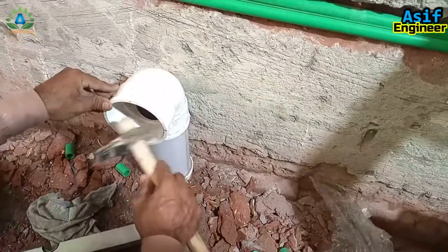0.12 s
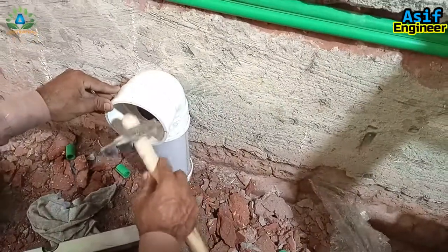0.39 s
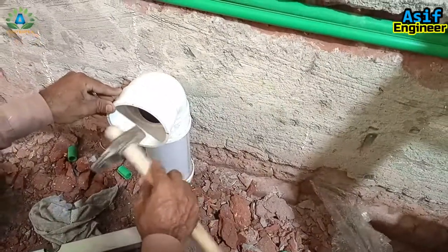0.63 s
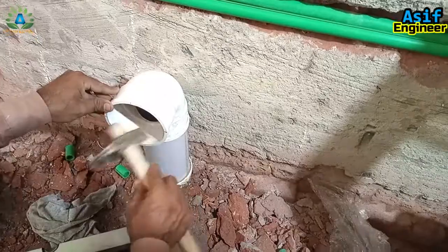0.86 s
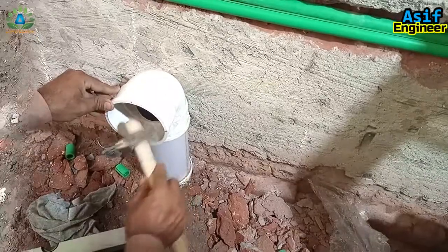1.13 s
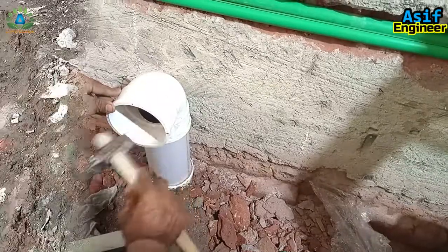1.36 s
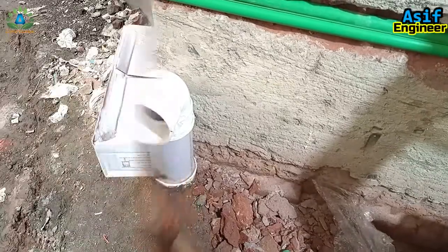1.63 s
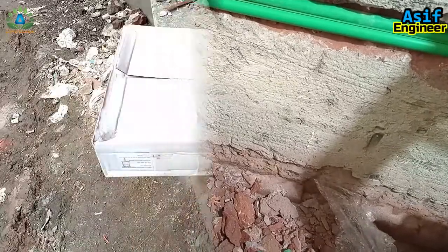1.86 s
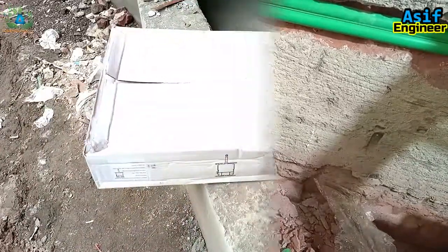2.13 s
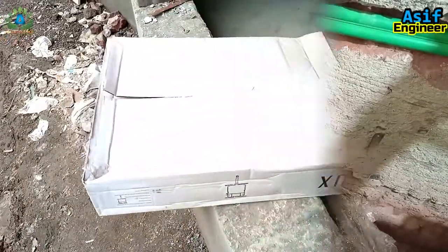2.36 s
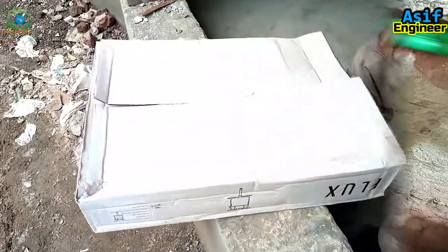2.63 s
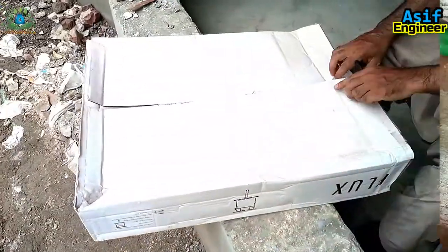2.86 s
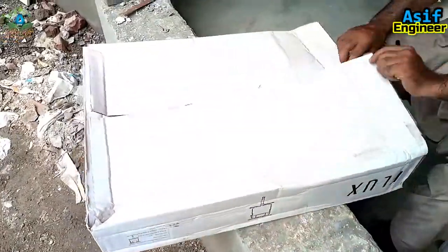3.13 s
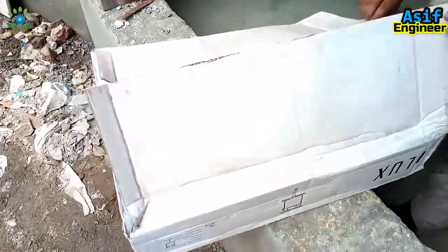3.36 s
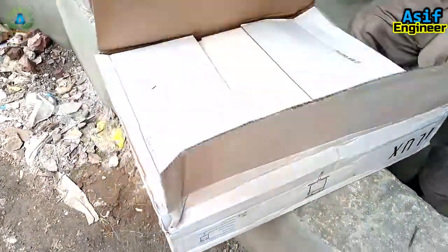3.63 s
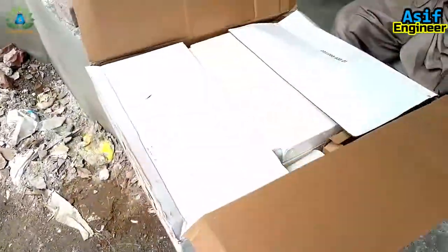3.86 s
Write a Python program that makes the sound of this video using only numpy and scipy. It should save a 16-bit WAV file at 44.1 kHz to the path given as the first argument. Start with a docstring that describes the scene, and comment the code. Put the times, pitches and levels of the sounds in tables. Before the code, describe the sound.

Hammer taps ring on a hollow plastic pipe, then a steady site roar with cardboard rustling.

```python
"""First a windy stereo moment: coloured hiss, short low sine thumps, faint ringing, a dull knock and a
steel clink made of narrow noise bands. At 0.44 s it cuts to mono: low hum sines over quiet hiss, while
a hammer taps a plastic pipe in a bare masonry space (noise cracks, ringing sines, echoes, a noisy tail).
This cross-fades into the louder roar of the site: noise, booming bands and a surging low sine.
There a cardboard box is knocked and rustles, as bursts of band noise."""
import sys
import numpy as np
from scipy import signal
from scipy.fft import rfft, irfft
from scipy.io import wavfile
from scipy.ndimage import uniform_filter1d

SR = 44100
rng = np.random.default_rng(int(sys.argv[2]) if len(sys.argv) > 2 else 0)


def field_ratio(decibels):
    """Amplitude ratio for a level in dB (20 dB per decade); scalars and array-likes work."""
    return 10 ** (np.asarray(decibels, dtype=float) / 20)


def materialize(psi):
    """Save the field psi as 16-bit PCM at rate SR to the path in sys.argv[1].

    A 1-D psi becomes a single channel; in a 2-D psi each row is a channel.
    """
    bounded = np.clip(np.atleast_2d(psi).T, -1, 1)
    quanta = np.round(bounded * 32767).astype(np.int16)
    wavfile.write(sys.argv[1], SR, quanta)


N = 176400
t = np.arange(N) / SR
CUT_S = .444  # the stereo moment is silent from here


def curve(points, hz):
    """Read a value off (Hz, value) points joined on a log-frequency axis."""
    p = np.array(points, float)
    return np.interp(np.log(hz + 1), np.log(p[:, 0]), p[:, 1])


def set_rms(x, db):
    """Scale a sound to an rms level in dB."""
    return x * field_ratio(db) / np.sqrt(np.mean(x ** 2))


def band(x, hz, width):
    """Keep the band of this width around hz, with a Butterworth filter."""
    edges = np.clip([hz - width / 2, hz + width / 2], 10, .49 * SR)
    return signal.sosfilt(signal.butter(2, edges, "band", fs=SR, output="sos"), x)


def walk(rate):
    """Slow random wander of spread 1: random steps, rate per second, smoothed into slopes."""
    step_samples = int(SR / rate)
    steps = np.repeat(rng.standard_normal(int(N / 400)), step_samples)[:N]
    wander = uniform_filter1d(steps, step_samples)
    return wander / np.std(wander)


def hiss(points, flicker_db, rate, t60=None, size=N):
    """Coloured noise in half-octave slices; each flickers, or dies away at its own rate."""
    hold_s = 0.028  # full level this long before dying away
    hz = np.fft.rfftfreq(size, 1 / SR)
    # The last two points are left out: the colour stays level above the one before them.
    spectrum = rfft(rng.standard_normal(size)) * field_ratio(curve(points[:-2], hz))
    out = 0
    for octave in np.arange(4, 15, .5):
        # Triangular slices that overlap, centred on 2 ** octave Hz
        share = np.clip(1 - 2 * abs(np.log2(hz + 1) - octave), 0, 1)
        part = irfft(spectrum * share, size)
        if t60 is None:
            out = out + part * field_ratio(flicker_db * walk(rate))
        else:
            dying_s = np.maximum(t[:size] - hold_s, 0)
            out = out + part * field_ratio(-60 * dying_s / curve(t60, 2 ** octave))
    return out


def ring(modes, size, rough_db, rate):
    """Decaying sines, one per way the object vibrates; each swells and dips by chance."""
    u = t[:size]
    out = np.zeros(size)
    for k, (hz, db, t60) in enumerate(modes):
        sign = (-1) ** k if hz > 300 else 1  # every other higher sine is flipped
        envelope = field_ratio(db - 60 * u / t60 + rough_db * walk(rate)[:size])
        out = out + sign * envelope * np.sin(2 * np.pi * hz * u)
    return out


def add(out, x, at):
    """Mix x into out from time at."""
    i = int(at * SR)
    out[..., i:i + x.shape[-1]] += x[..., :N - i]


def puff(at, db, hz, width, rise, t60):
    """Band noise that rises and dies; db is its rms before that shaping."""
    u = np.maximum(t - at, 0)
    noise = set_rms(band(rng.standard_normal(N), hz, width), db)
    return noise * (1 - np.exp(-u / rise)) * field_ratio(-60 * u / t60)


def colour(x, points):
    """Filter a sound by (Hz, dB) points."""
    return irfft(rfft(x) * field_ratio(curve(points, np.fft.rfftfreq(N, 1 / SR))), N)


def wind():
    """Wind as flickering hiss, with separate noise for the middle and the side of the stereo image."""
    # Colour of the wind. Each row: frequency in Hz, relative level per Hz in dB.
    wind_colour = [(12, -40), (20, 3), (162, -5), (229, -5), (366, -6), (456, -12.5), (766, -16.5),
                   (2150, -23), (2380, -25), (6520, -32.5), (7200, -38.5), (9360, -59.5), (15800, -120)]
    # Recording filter: steep drop near 8 kHz, faint treble above. Each row: frequency in Hz, gain in dB.
    recording_filter = [(6600, 0), (7500, -6), (7850, -45), (8600, -45), (8850, -14), (11800, -13),
                        (12300, -20), (15400, -24), (15800, -80)]
    mid = colour(set_rms(hiss(wind_colour, 1.2, 25), -46.5), recording_filter)
    side = colour(set_rms(hiss(wind_colour, 1.2, 25), -52.5), recording_filter)
    return mid, side


def thumps():
    """Gusts thump the ports: short low sines under a bell-shaped swell, higher at the side."""
    # Thumps. Each row: time of the peak in seconds, mid peak in dB, mid pitch in Hz,
    # length in seconds, side level relative to mid in dB.
    thump_rows = [(.002, -20.5, 100, 0.0095, -9), (0.017, -30.5, 139, 0.036, -11),
                  (0.049, -34.5, 105, .035, -9), (0.145, -35.5, 99.7, 0.025, -13),
                  (0.169, -20, 90.7, 0.0067, -6), (0.186, -20.5, 150, 0.017, -10),
                  (.182, -26, 300, 0.006, -3), (0.201, -30.5, 89.7, 0.033, -10),
                  (0.288, -44.5, 302.5, 0.016, -5), (0.335, -48, 324.5, 0.056, -6),
                  (0.394, -31, 85.8, 0.025, -15)]
    mid, side = np.zeros(N), np.zeros(N)
    for at, db, hz, length, side_db in thump_rows:
        shape = field_ratio(db) * np.exp(-(2 * (t - at) / length) ** 2)
        phase = rng.random(2)
        mid = mid + shape * np.sin(2 * np.pi * (hz * t + phase[0]))
        side = side + shape * field_ratio(side_db) * np.sin(2 * np.pi * (1.4 * hz * t + phase[1]))
    return mid, side


def whine():
    """Faint far ringing: three narrow noise bands dying by 50 dB a second."""
    out = np.zeros(N)
    for hz, db in [(2300, -64), (4300, -66), (11700, -88)]:
        out = out + set_rms(band(rng.standard_normal(N), hz, 120), db)
    return out * field_ratio(-50 * t)


def knock():
    """A dull knock: one quick burst of noise around 760 Hz."""
    return puff(at=.024, db=-41, hz=760, width=640, rise=0.001, t60=0.25)


def clink():
    """A steel tool clinks: narrow noise bands ring at its modes, then drop to a tenth."""
    start_s, stop_s, level_db = .301, .378, -45.5
    # Steel modes. Each row: frequency in Hz, relative level in dB, time to fall 60 dB in seconds.
    steel = [(850, -5.5, 0.63), (1205, -4.5, 0.38), (1296, -1.5, 0.74), (1664, -5, 0.27), (2184, -9.5, 1),
             (4685, -1.5, 0.13), (6240, -17, 0.2), (6500, -14, .1), (9300, -26, 0.16), (9870, -20, .18),
             (11320, -18, 0.12), (13770, -35.5, .4), (14600, -46, 0.415)]
    out = np.zeros(N)
    for hz, db, t60 in steel:
        out = out + puff(start_s, level_db + db, hz, 94 + 0.014 * hz, 0.0012, t60)
    return out * np.clip((stop_s - t) / .01, .1, 1)


def windy_shot():
    """Left and right are mid plus and minus side, so wind and thumps differ between them."""
    wind_mid, wind_side = wind()
    thump_mid, thump_side = thumps()
    ringing = whine() + clink()
    mid = wind_mid + thump_mid + knock() + ringing
    side = wind_side + thump_side + ringing * field_ratio(-2.5)
    return np.array([mid + side, mid - side]) * np.clip((CUT_S - t) / 0.0059, 0, 1)


def yard():
    """Quiet flickering hiss with low hum sines whose pitch drifts a little."""
    # Colour of the hiss. Each row: frequency in Hz, relative level per Hz in dB.
    yard_colour = [(25, -35), (60, -10), (100, -8.5), (150, -10), (250, -12), (500, -16), (900, -17.5),
                   (2000, -16.5), (4000, -21.5), (7200, -28), (9000, -28), (16000, -28)]
    # Hum sines. Each row: frequency in Hz, rms level before wavering in dB, waver of level in dB.
    hum_rows = [(118, -63.5, 6), (278.6, -78.5, 0)]
    hum = np.zeros(N)
    for hz, db, waver_db in hum_rows:
        peak = np.sqrt(2) * field_ratio(db + waver_db * walk(12))
        hum = hum + peak * np.sin(2 * np.pi * (hz * t + 0.041 * walk(1.7)))
    return set_rms(hiss(yard_colour, 0.33, 8.9), -58) + hum


def hammer():
    """Each tap: a crack, the ringing pipe wall and air column, echoes and a noisy tail from the walls."""
    # Taps. Each row: start in seconds, overall level in dB, then gains in dB for treble, bass, pipe ring.
    taps = [(0.441, -28, -8.5, 3, 1), (0.796, -21, 2, -2.5, -1), (1.173, -18.5, 3.5, -3.5, -1),
            (1.571, -19.5, 2.5, -4.5, -2.5)]
    # Pipe wall modes. Each row: frequency in Hz, relative level in dB, time to fall 60 dB in seconds.
    pipe = [(461, -5, .4), (590, -14, .4), (732, -8, .45), (786, -8, .5), (824, -8, .35), (930, -9, .2),
            (990, -3, .16), (1210, -11, .25), (1300, -1, .22), (1378, -6, .2), (1880, -6, .13),
            (2035, -10, .3), (2215, -8, .4), (2420, -8, .35), (2560, -7, .08)]
    # Air column and wall modes. Each row: the same three columns.
    column = [(93, -13, 1), (196.7, 1.5, 0.38), (250.7, -18, 1.8)]
    # A close pair that beats. Each row: the same three columns.
    column_pair = [(173, -7, 1.6), (177, -8.5, 1.2)]
    # Colour of the tail. Each row: frequency in Hz, relative level per Hz in dB.
    tail_colour = [(140, -35), (230, -6.5), (460, -5), (600, -4.5), (800, 2.5), (1000, -2), (1130, -7),
                   (1310, -1), (1600, -8), (2300, -4), (2700, -13.5), (4500, -18.5), (7200, -21.5),
                   (9000, -20), (16000, -20)]
    # Decay of the tail. Each row: frequency in Hz, time to fall 60 dB in seconds.
    tail_t60 = [(80, 0.4), (180, 0.97), (400, .5), (800, 0.33), (1600, 0.26), (3000, 0.34), (6000, 0.21),
                (12000, 0.18)]
    # Echoes from the walls. Each row: delay in seconds, level in dB.
    echoes = [(.021, -8.5), (.044, -10), (.07, -23.5), (.11, -20.5)]
    pipe_db, crack_db, tail_db, crack_t60_s = -15.5, -4, -15, 0.023  # levels within a tap
    out, size = np.zeros(N), 40000
    u = t[:size]
    for at, db, treble_db, bass_db, ring_db in taps:
        tail = hiss(tail_colour, 0, 1, tail_t60, size=size)
        tail = tail / np.std(tail[:2000])  # its opening has spread 1
        tail = field_ratio(tail_db) * tail * (1 - np.exp(-u / 0.0011))
        crack = band(rng.standard_normal(size), 4300, 4400) * field_ratio(crack_db - 60 * u / crack_t60_s)
        body = field_ratio(pipe_db + ring_db) * ring(pipe, size=size, rough_db=2.0, rate=52)
        tap = tail + crack + body
        for late, echo_db in echoes:
            add(tap, (field_ratio(echo_db) * (body + .3 * crack))[:size // 2], late)
        tap = tap + (field_ratio(treble_db) - 1) * band(tap, 6150, 8200)  # lift or lower the treble
        air = ring(column + column_pair, size=size, rough_db=-3.2, rate=5)
        air = field_ratio(bass_db - 14) * (1 - np.exp(-u / 0.003)) * air
        add(out, field_ratio(db) * (tap + air), at)
    return out


def roar():
    """The steady roar of the site: coloured noise that flickers slightly."""
    # Colour of the roar. Each row: frequency in Hz, relative level per Hz in dB.
    roar_colour = [(25, -23), (55, -7), (85, -6), (150, -7.5), (260, -8), (570, -11.5), (870, -12.5),
                   (1200, -12), (2200, -10.5), (3400, -14.5), (4200, -17), (4700, -22.5), (6400, -22),
                   (7200, -26.5), (9000, -25), (16000, -25)]
    return set_rms(hiss(roar_colour, 0.27, 10), -46)


def boom():
    """Booming low resonances: bands of noise that swell and dip by chance."""
    # Resonances. Each row: centre in Hz, width in Hz, rms level before swelling in dB.
    resonances = [(115, 22, -59.5), (191, 31, -61.5), (266, 23, -60.5), (351.4, 61, -62.5),
                  (690, 40, -64.5), (844, 140, -57.5)]
    out = np.zeros(N)
    for hz, width, db in resonances:
        out = out + set_rms(band(rng.standard_normal(N), hz, width), db) * field_ratio(2.0 * walk(9))
    return out


def surge():
    """The lowest boom: an 85 Hz sine with a wandering phase, surging along a level curve."""
    # Surges. Each row: time in seconds, rms level in dB ahead of a 2.5 dB cut.
    surge_levels = [(2.3, -60), (2.328, -47.5), (2.532, -57), (2.578, -46), (2.64, -60.5), (3.01, -46.5),
                    (3.076, -72), (3.128, -51.5), (3.17, -48), (3.27, -60), (3.312, -55), (3.516, -48),
                    (3.606, -59), (3.658, -46.5), (3.814, -59), (3.872, -39), (3.97, -69), (4.0, -48)]
    times, levels = np.array(surge_levels).T
    peak = field_ratio(np.interp(t, times, levels) - 2.5) * np.sqrt(2)
    return peak * np.sin(2 * np.pi * (85 * t + 0.21 * walk(11)))


def box():
    """A cardboard box is knocked and rustles: quick and slow bursts of band noise."""
    # Box sounds. Each row: start in seconds, rms level before shaping in dB, centre in Hz,
    # width in Hz, rise in seconds, time to fall 60 dB in seconds.
    box_rows = [(2.2, -56, 6300, 2500, .05, 1.2), (2.532, -48, 670, 200, .002, .3),
                (2.533, -58, 5500, 4000, .001, .06), (2.56, -46, 580, 150, .02, .4),
                (2.75, -50, 3300, 2000, .3, 2.5), (2.91, -62, 6000, 4000, .001, .05),
                (3.06, -50, 900, 300, .03, .6), (3.1, -51, 6300, 2600, .06, .7),
                (3.6, -58, 6500, 3000, .06, .8)]
    return sum(puff(*row) for row in box_rows)


def site():
    """The roar, booms and surges of the site, with the box."""
    return roar() + boom() + surge() + box()


def scene():
    """Cut from wind to hammer, then cross-fade to the site; the mono part has a duller treble."""
    # Recording filter: steep drop near 8 kHz, faint treble above. Each row: frequency in Hz, gain in dB.
    recording_filter = [(25, -20), (50, -4), (75, 1.5), (7200, 1), (7700, -9), (8500, -33), (10200, -30),
                        (11500, -33), (13000, -47), (15400, -33), (15800, -93)]
    windy = windy_shot()
    tapping = yard() * (t > CUT_S - .004) + hammer()
    tapping = tapping * np.interp(t, (1.44, 2.49), [1, 0])
    building = site() * np.interp(t, (2.047, 2.443), [0, 1]) ** 0.75
    return windy + colour(tapping + building, recording_filter)


def roll_off(x):
    """The treble ends steeply here."""
    return signal.sosfilt(signal.butter(12, 15600, fs=SR, output="sos"), x)


def record(dry):
    """Turn the finished mix into the sound that is written out."""
    return roll_off(dry)


dry = scene()
out = record(dry)
materialize(out)
```